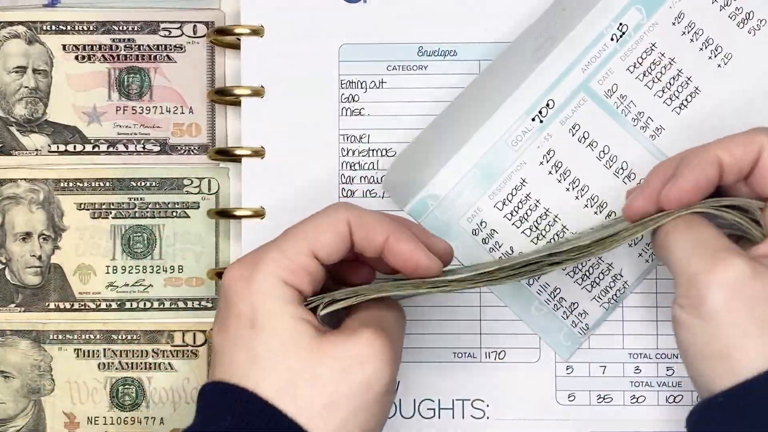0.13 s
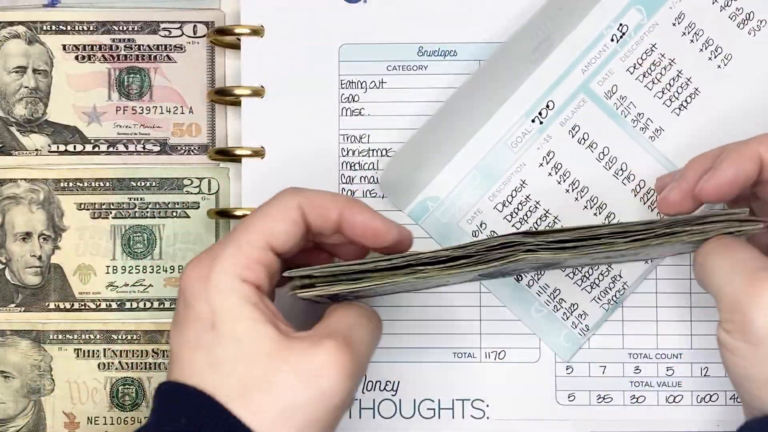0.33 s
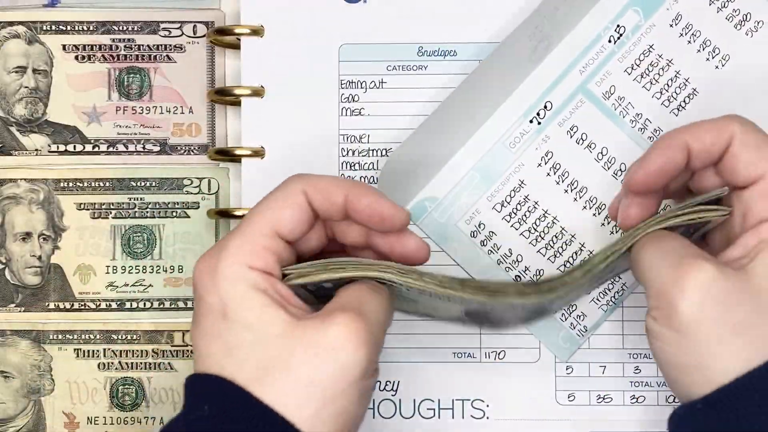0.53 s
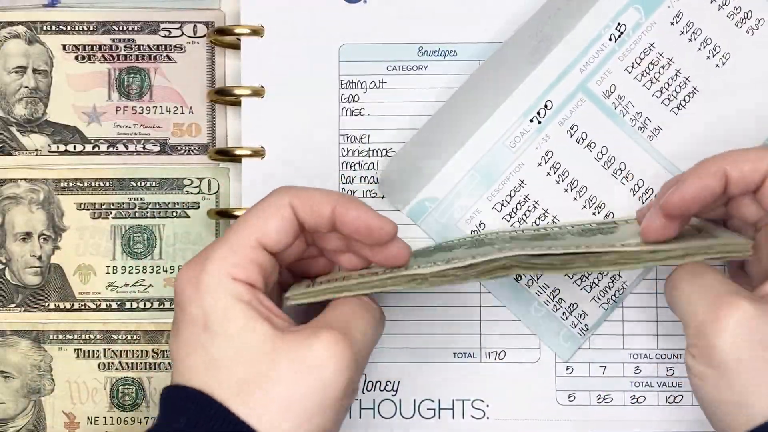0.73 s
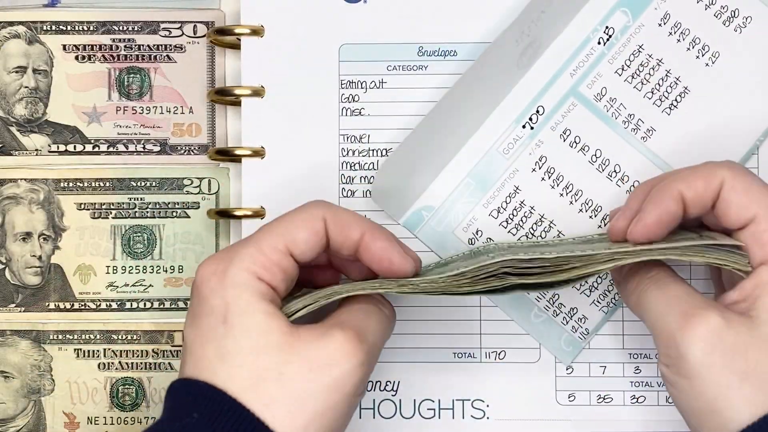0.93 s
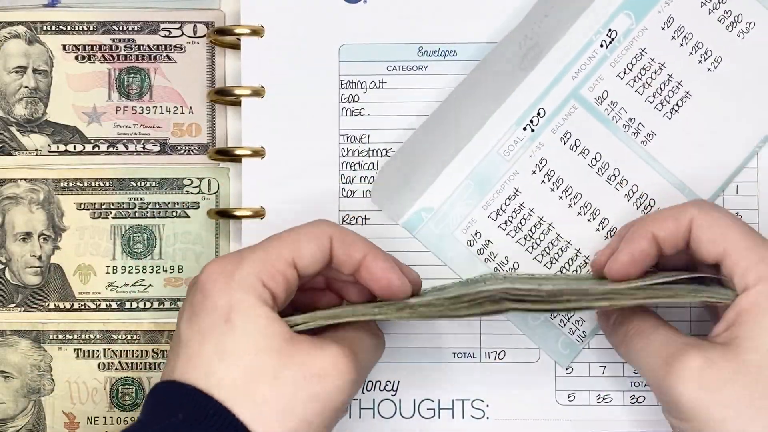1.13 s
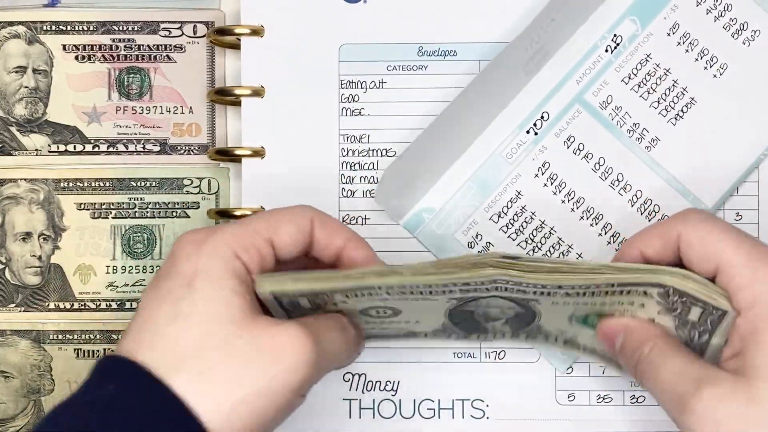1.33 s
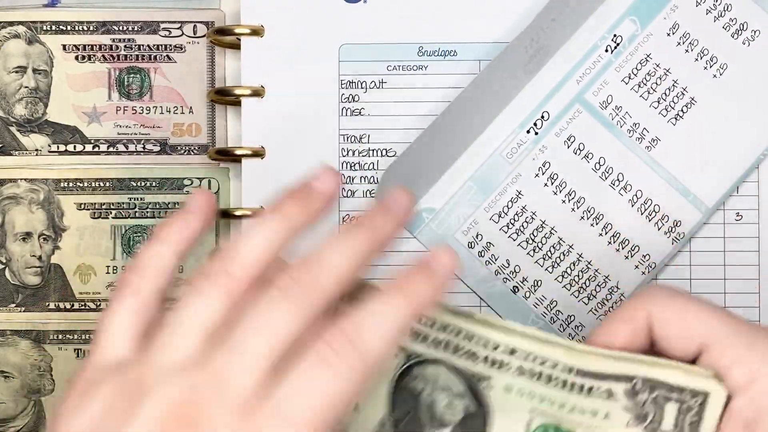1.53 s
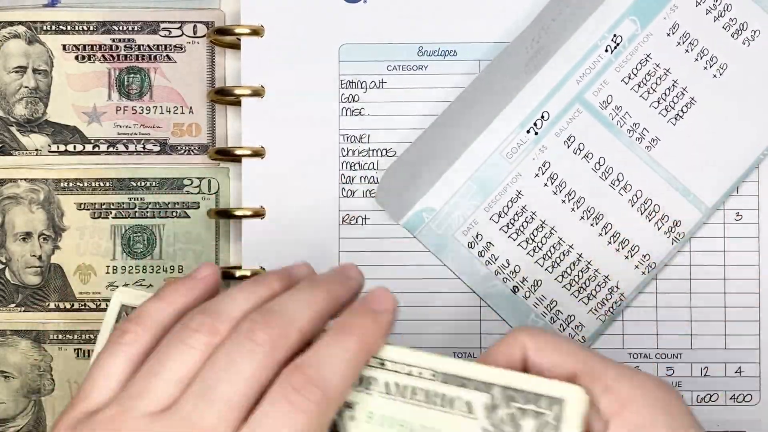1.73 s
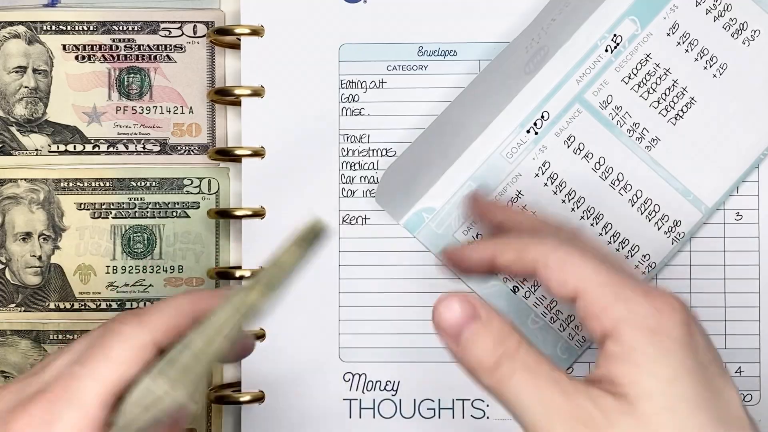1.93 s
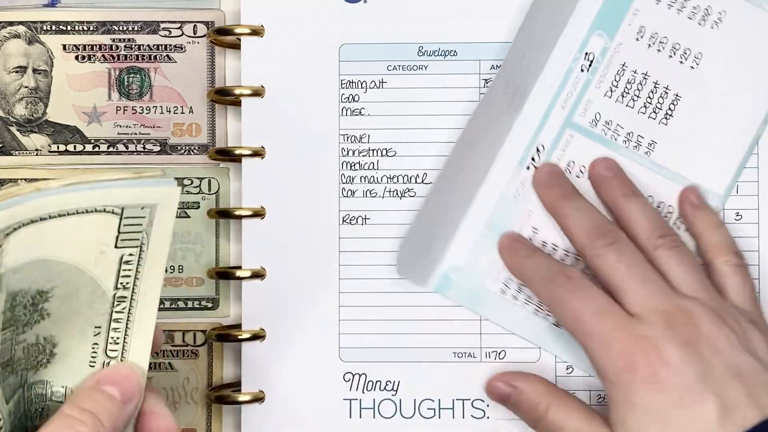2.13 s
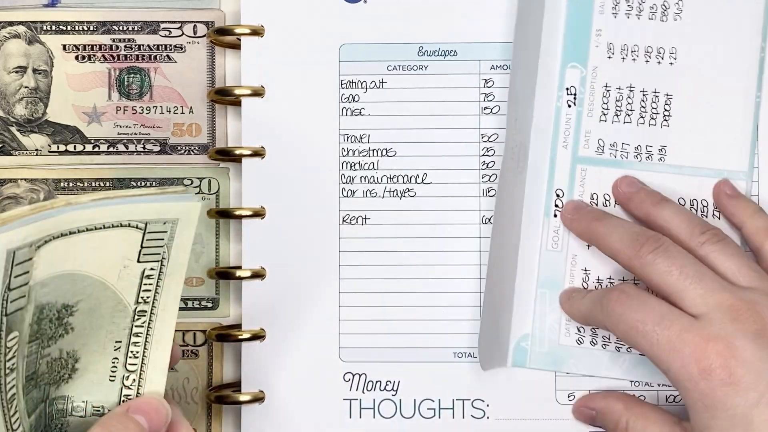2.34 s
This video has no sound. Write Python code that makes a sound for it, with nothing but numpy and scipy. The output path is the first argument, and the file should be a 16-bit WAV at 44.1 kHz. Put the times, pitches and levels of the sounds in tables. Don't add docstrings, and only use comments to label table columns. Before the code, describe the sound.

Paper bills knocked square on a desk, the first tap loudest and snappy, two more following, then thin sheets slip and flex between fingers; close mono microphone, dry quiet room, low rumble from moving hands.

```python
import sys
import numpy as np
from scipy import signal
from scipy.fft import rfft, irfft
from scipy.io import wavfile
from scipy.ndimage import uniform_filter1d

SR = 44100
rng = np.random.default_rng(int(sys.argv[2]) if len(sys.argv) > 2 else 0)


def natural_amplitude(level_db):
    exponent = np.asarray(level_db, float) / 20
    return 10 ** exponent


def file_out(sig):
    cols = np.atleast_2d(sig).T
    lim = np.clip(cols, -1, 1)
    pcm = np.round(lim * 32767).astype(np.int16)
    wavfile.write(sys.argv[1], SR, pcm)


N = 105222


def evened(x):
    return x / np.sqrt(np.mean(x ** 2) + 1e-20)


def colour(x, points):
    bin_hz = abs(np.fft.fftfreq(8192, 1 / SR))
    point_hz, point_db = np.transpose(points)
    gain_db = np.interp(np.log(bin_hz + 0.1), np.log(point_hz), point_db)
    log_gain = np.log(natural_amplitude(np.maximum(gain_db, -100)))
    spectrum = np.exp(np.conj(signal.hilbert(log_gain)))
    taps = np.fft.ifft(spectrum).real[:4096]
    return signal.oaconvolve(x, taps / np.linalg.norm(taps))[:N]


def ring(x, pitch_hz, width_hz):
    return signal.lfilter(*signal.iirpeak(pitch_hz, pitch_hz / width_hz, SR), x)


def grains(per_s):
    spread_db, click_share = 4.0, 0.35
    size = natural_amplitude(spread_db * np.minimum(rng.exponential(1, N), 4)) * rng.choice([-1., 1.], N)
    clicks = evened(size * (rng.random(N) < per_s / SR))
    return click_share * clicks + np.sqrt(1 - click_share ** 2) * rng.standard_normal(N)


def paper(crisp_env, dull_env, per_s):
    # [Hz, dB]
    crisp_curve = [(200, -30), (420, 0), (900, -26), (1500, -8.5), (3300, -5.5), (6000, -1.5),
                   (10300, -0.5), (15500, -12.5), (17000, -35)]
    # [Hz, dB]
    dull_curve = [(70, -48.5), (150, 8.5), (400, -1.5), (2040, -1.5), (2610, -10), (3400, -7.5), (6570, -2),
                  (10600, -9.5), (15500, -62.5)]
    # [Hz, Hz, dB]
    stack_modes = [(1232, 63, -1.5), (1480, 120, -5.5), (2078, 150, -4), (3000, 307, 2), (4050, 40, -38),
                   (5500, 51, -6)]
    drive = grains(per_s)
    sheet = colour(crisp_env * drive, crisp_curve)
    stack = colour(dull_env * drive, dull_curve)
    modes = sum(natural_amplitude(level_db + 5.5) * ring(stack, pitch_hz, 2.6 * width_hz + 60)
                for pitch_hz, width_hz, level_db in stack_modes)
    return sheet + stack + modes


def room_hush():
    # [Hz, dB]
    room_curve = [(40, 1), (90, -4), (160, -8.5), (420, -14.5), (900, -20.5), (3000, -27.5), (9000, -28),
                  (15500, -28), (17000, -52.5)]
    return natural_amplitude(-64) * colour(rng.standard_normal(N), room_curve)


def air(t):
    # [s, full scale, s]
    push_table = [(.01, 0.092, 0.028), (0.136, 0.099, 0.018), (0.298, 0.22, 0.026), (0.397, -0.039, 0.011),
                  (0.503, 0.11, 0.0229), (.56, 0.059, 0.015), (0.707, 0.21, 0.021), (0.752, 0.13, 0.027),
                  (0.932, 0.052, 0.031), (1.056, 0.17, .03), (1.12, 0.066, 0.021), (1.316, 0.14, 0.04),
                  (1.518, 0.15, 0.042), (1.757, 0.19, 0.023), (1.816, 0.25, 0.018), (1.898, -0.16, 0.025),
                  (2.098, .1, 0.1), (2.242, 0.076, 0.022)]
    # [Hz, dB]
    rumble_curve = [(8, -18.5), (16, 3.5), (28, -3.5), (45, -18.5), (70, -23), (130, -40.5)]
    rest_pressure, rumble_db, gust_db = -0.061, -42.5, 13
    swing = sum(pressure * np.exp(-0.5 * ((t - time_s) / width_s) ** 2)
                for time_s, pressure, width_s in push_table)
    bin_hz = np.fft.rfftfreq(N, 1 / SR)
    point_hz, point_db = np.transpose(rumble_curve)
    shape = natural_amplitude(np.interp(np.log(bin_hz + 0.088), np.log(point_hz), point_db, -90, -90))
    noise = evened(irfft(rfft(rng.standard_normal(N)) * shape, N))
    speed = uniform_filter1d(abs(np.gradient(swing)), size=3000)
    rumble = natural_amplitude(rumble_db + gust_db * speed / speed.max()) * noise
    closing = np.clip((t[-1] - t) / 0.02, 0.45, 1)
    return (rest_pressure + swing + rumble) * closing


def rubs(t):
    # [s, s, dB, Hz]
    rub_table = [
        (-.05, 0.39, -59.5, 567),
        (0.397, .14, -63.5, 490),
        (1.199, 0.028, -46.5, 4000),
        (2.12, 0.26, -71, 480),
    ]
    drive = grains(260)
    out = np.zeros(N)
    for start_s, length_s, level_db, centre_hz in rub_table:
        env = np.sin(np.pi * np.clip((t - start_s) / length_s, 0, 1)) ** 0.61
        once = ring(drive, centre_hz, centre_hz * 0.8)
        out += natural_amplitude(level_db) * env * evened(ring(once, centre_hz, centre_hz * 0.8))
    return out


def slides(t):
    # [s, s, dB, 0-1, 0-1]
    slide_table = [(-.02, 0.088, -41, 0.74, 0.28), (0.055, 0.066, -42, 0.58, 0.2),
                   (0.092, 0.18, -60.5, 0.19, 0.47), (0.204, 0.16, -56, 0.23, 0.27),
                   (0.335, 0.12, -52.5, 0.059, .45), (0.412, 0.1, -44, 0.76, 0.21),
                   (0.503, 0.062, -57, 0.43, 0.3), (0.645, 0.058, -52.5, 0.76, 0.23),
                   (0.726, 0.14, -47, 0.05, 0.28), (0.826, 0.094, -46.5, 0.19, 0.21),
                   (1.121, 0.11, -52.5, .05, 0.43), (1.183, 0.054, -47.5, 0.55, 0.4),
                   (1.244, 0.014, -40.5, 0.42, 0.26), (1.291, .015, -44.5, 0.28, 0.13),
                   (1.252, 0.36, -60.5, 0.19, 0.18), (1.583, 0.2, -55.5, 0.047, 0.16),
                   (1.724, 0.032, -54, 0.45, 0.26), (1.768, 0.15, -49.5, 0.21, 0.23),
                   (1.926, 0.15, -55.5, 0.76, 0.38), (2.048, 0.23, -42, 0.39, 0.05),
                   (2.221, 0.18, -52.5, 0.53, 0.28), (1.015, 0.15, -62, 0.94, 0.11),
                   (1.178, 0.14, -59.5, 0.33, 0.14), (1.375, 0.14, -69.5, 0.74, 0.14)]
    crisp_env, dull_env = np.zeros(N), np.zeros(N)
    for start_s, length_s, level_db, rise_share, dullness in slide_table:
        u = (t - start_s) / length_s
        ramp = np.clip(np.minimum(u / rise_share, (1 - u) / (1 - rise_share)), 0, 1)
        env = natural_amplitude(level_db - 2.5) * np.sin(np.pi / 2 * ramp) ** 1.066
        crisp_env += (1 - dullness) * env
        dull_env += dullness * env
    drift = uniform_filter1d(rng.standard_normal(N), size=200)
    waver = natural_amplitude(1.5 * evened(uniform_filter1d(drift, size=200)))
    return paper(crisp_env * waver ** 0.64, dull_env * waver ** 1.18, per_s=1200)


def knocks(t):
    # [s, dB, Hz, s]
    knock_table = [(0.0906, -45, 1220, 0.036), (0.1923, -52, 245, 0.089), (0.3128, -35, 420, 0.11),
                   (0.3226, -28.5, 171, 0.083), (.3270, -17.5, 3304, 0.013), (0.3283, -33, 78, 0.14),
                   (0.3281, -29, 5030, 0.014), (0.3796, -41, 260, 0.041), (0.5211, -44, 1080, 0.015),
                   (0.5326, -47, 1124, 0.016), (0.5346, -48, 202, 0.058), (0.711, -43, 545, 0.066),
                   (0.7255, -18.5, 1445, 0.0078), (0.7266, -39, 121.7, 0.19), (0.73, -45, 71, 0.38),
                   (0.7748, -46, 128, 0.043), (0.964, -56, 291, 0.078), (1.1050, -32, 404, 0.048),
                   (1.1108, -31, 75, 0.18), (1.1196, -36.5, 124, 0.11), (1.4218, -55.5, 274, 0.15),
                   (1.7208, -47, 2180, 0.023), (1.7522, -49, 149, 0.099), (1.7868, -37, 584, 0.016),
                   (1.818, -43, 60, 0.16), (1.9105, -53, 150, 0.075), (2.050, -53, 1500, 0.043),
                   (2.074, -48.5, 830, 0.044), (2.087, -51, 790, 0.043), (2.217, -51.5, 101, 0.22)]
    out = np.zeros(N)
    noise = rng.standard_normal(N)
    for time_s, level_db, pitch_hz, t60_s in knock_table:
        detune, phase = rng.random(2)
        u = np.maximum(t - time_s, 0)
        env = natural_amplitude(level_db - 60 * u / t60_s) * np.minimum(u * pitch_hz * 3.2, 1)
        second_hz = pitch_hz * (1.35 + 0.32 * detune)
        pair = np.sin(2 * np.pi * pitch_hz * u) + 0.32 * np.sin(2 * np.pi * (second_hz * u + phase))
        puff = 1.064 * evened(ring(noise, pitch_hz, pitch_hz * 0.31))
        out += env * (pair + puff)
    return out


def snaps(t):
    # [s, dB, 0-1, s]
    snap_table = [(0.095, -39, 0.32, 0.011), (0.3106, -19.5, 0.34, 0.019), (0.317, -31, 0.96, 0.0027),
                  (0.327, -15, 0.44, 0.0025), (.3290, -15, 0.53, 0.002), (0.377, -32, 0.44, 0.016),
                  (0.525, -48, 0.7, 0.0074), (0.564, -33, 0.43, 0.0049), (0.7074, -29, 0.54, 0.003),
                  (0.709, -22, 0.43, 0.0077), (0.7164, -30, 0.3, 0.005), (0.7205, -21.5, 0.44, 0.012),
                  (0.789, -38.5, 0.21, 0.015), (1.106, -26, 0.56, .008), (1.1135, -23, 0.47, 0.013),
                  (1.1773, -38, 0.05, 0.005), (1.195, -39, 0.4, 0.0069), (1.202, -37, 0.34, 0.011),
                  (1.22, -37.5, 0.35, 0.0064), (1.235, -45, 0.33, 0.0089), (1.278, -48, 0.17, 0.016),
                  (1.576, -43, 0.23, 0.016), (1.613, -42, 0.35, 0.0052), (1.7092, -43, 0.2, 0.0027),
                  (1.719, -38, 0.26, 0.0078), (1.731, -34, 0.43, 0.0095), (1.756, -43.5, 0.7, 0.0084),
                  (1.786, -41, 0.33, 0.008), (1.7975, -42, 0.4, 0.005), (1.833, -40, 0.35, 0.02),
                  (2.034, -40, 0.33, 0.014), (2.048, -42, 0.55, 0.012)]
    crisp_env, dull_env = np.zeros(N), np.zeros(N)
    for time_s, peak_db, dullness, length_s in snap_table:
        u = (t - time_s) / length_s
        decay = np.exp(-2.2 * np.clip(u, 0, 9) ** 1.6)
        env = natural_amplitude(peak_db - 4) * np.clip(u * 6, 0, 1) * decay
        crisp_env += (1 - dullness) * env
        dull_env += dullness * env
    return paper(crisp_env, dull_env, per_s=4400)


def ticks():
    # [s, dB, Hz, s]
    tick_table = [(0.100, -55.5, 403, .004), (0.166, -53, 500, 0.0028), (0.3125, -31, 1071, .003),
                  (0.3174, -16, 1380, 0.00013), (0.323, -31.5, 475, 0.0048), (0.324, -30, 890, 0.0024),
                  (0.3242, -29.5, 1570, .003), (0.326, -21.5, 1955, 0.0014), (0.3278, -19, 7000, 0.000053),
                  (0.3290, -21.5, 3280, 0.00091), (0.707, -27.5, 3000, 0.000084),
                  (0.7100, -21.5, 4940, 0.00011), (0.7221, -26, 1210, 0.0022),
                  (0.7228, -22.5, 1985, 0.0015), (0.724, -26.5, 3420, .001), (0.727, -32, 558, 0.0037),
                  (0.785, -48, 1250, 0.0018), (0.786, -50.5, 660, 0.0022), (0.840, -50, 3070, 0.0031),
                  (1.1052, -24.5, 347, 0.0013), (1.112, -36.5, 703, 0.0046), (1.115, -33.5, 1050, 0.0027),
                  (1.115, -31.5, 1654, 0.0033), (1.1155, -34.5, 2093, 0.0024), (1.158, -48.5, 994, 0.0014),
                  (1.2995, -46.5, 1347, .0012), (1.432, -58, 302, .005), (1.5764, -51, 1410, 0.00084),
                  (1.581, -54, 1020, 0.0014), (1.6135, -52, 3600, 0.00076), (1.7208, -37, 2020, 0.00053),
                  (1.7235, -43.5, 1130, 0.00055), (1.7602, -45, 1350, 0.00093),
                  (1.7866, -30.5, 1000, 0.00026), (1.836, -56, 1010, 0.0022), (1.847, -53, 1090, 0.0017),
                  (2.0585, -39, 600, 0.0014), (2.0712, -34.5, 800, 0.00041), (2.0875, -39, 1060, 0.00094),
                  (2.277, -54, 2950, .003), (0.3116, -26, 4530, 0.000083), (0.3272, -19.5, 5120, 0.0011),
                  (0.3274, -32, 12500, 0.00029), (1.7874, -36.5, 1900, .0002), (1.839, -49, 2010, 0.0023),
                  (0.095, -54.5, 257, 0.0069), (1.585, -51, 95, 0.0093), (1.825, -46, 109, 0.0064),
                  (2.07, -53.5, 242, 0.0036), (2.185, -51.5, 109, .01)]
    out = np.zeros(N)
    u = np.arange(4096) / SR
    for time_s, peak_db, pitch_hz, rise_s in tick_table:
        at = round(time_s * SR)
        env = natural_amplitude(peak_db) * u / rise_s * np.exp(1 - u / rise_s)
        out[at:at + len(u)] += env * np.sin(2 * np.pi * pitch_hz * u)
    return out


def echo(x):
    echo_db, t60_s, spacing = -13, 0.15, 22
    taps = np.zeros(SR // 3)
    at = np.arange(90, len(taps) - spacing, spacing)
    sign = rng.choice([-1., 1.], len(at))
    taps[at + rng.integers(0, spacing, len(at))] = sign * natural_amplitude(-60 * at / SR / t60_s)
    return natural_amplitude(echo_db) * signal.oaconvolve(x, taps / np.linalg.norm(taps))[:N]


def scene():
    t = np.arange(N) / SR
    near = rubs(t) + slides(t) + knocks(t) + snaps(t) + ticks()
    return (near + echo(near) + room_hush() + air(t))[None]


def top_cut(x):
    return signal.sosfilt(signal.butter(12, 16470, fs=SR, output="sos"), x)


def record(dry):
    low_pass = signal.firwin(511, 15750, window=("kaiser", 5), fs=SR)
    mix = signal.oaconvolve(dry, low_pass[None], "same")
    return top_cut(mix)


dry = scene()
out = record(dry)
file_out(out)
```